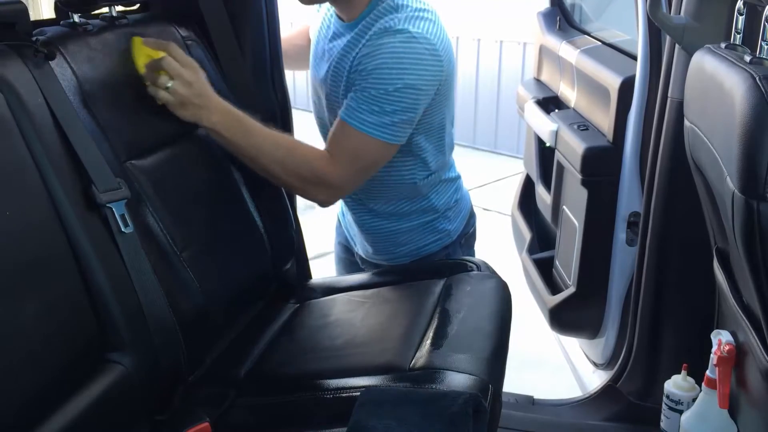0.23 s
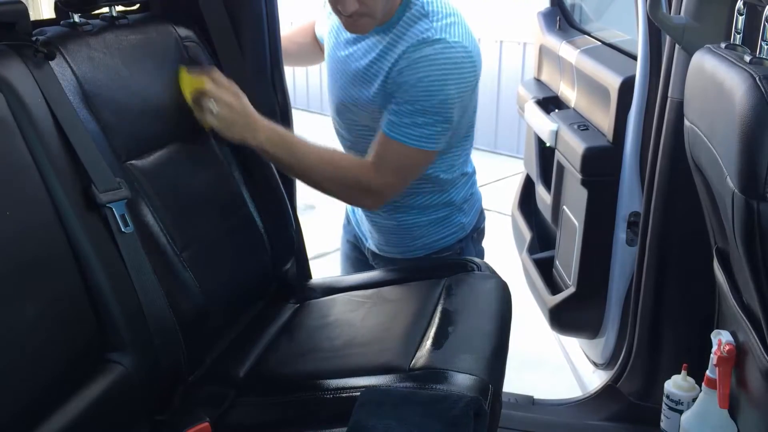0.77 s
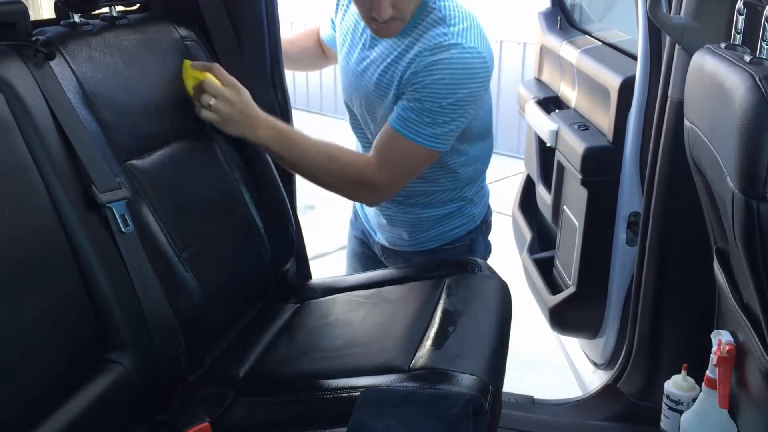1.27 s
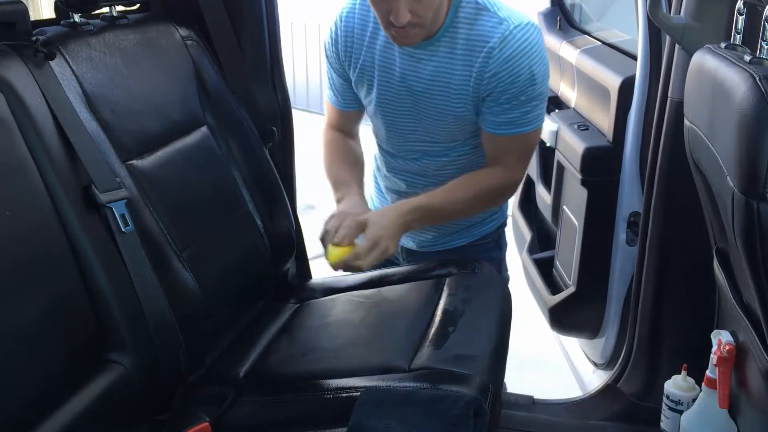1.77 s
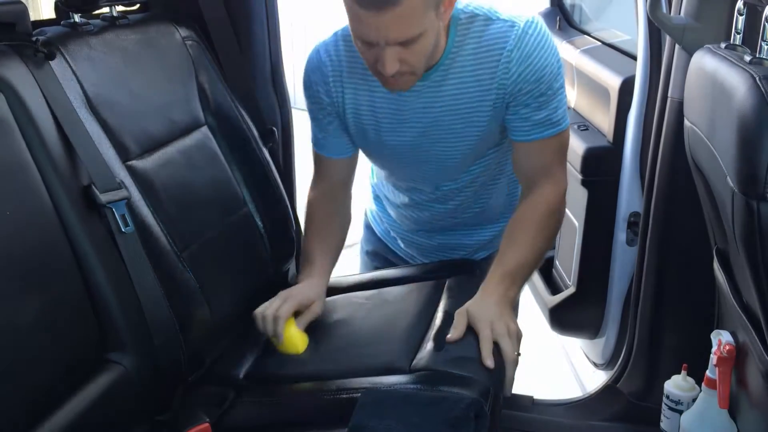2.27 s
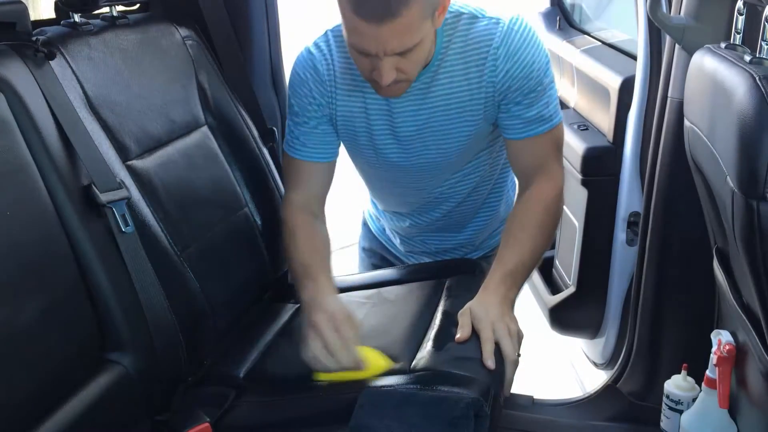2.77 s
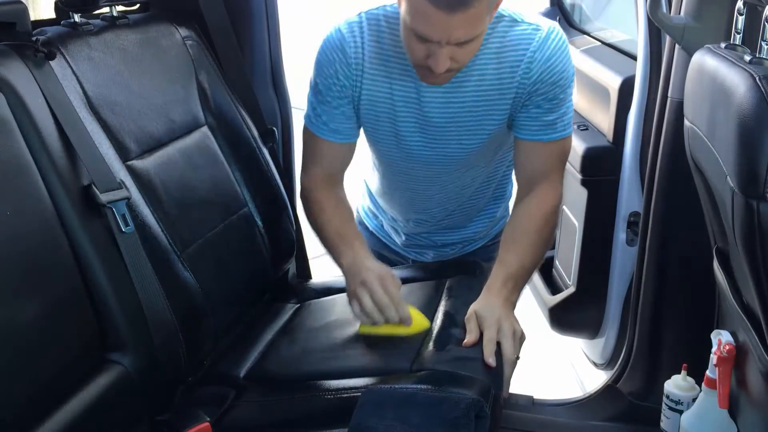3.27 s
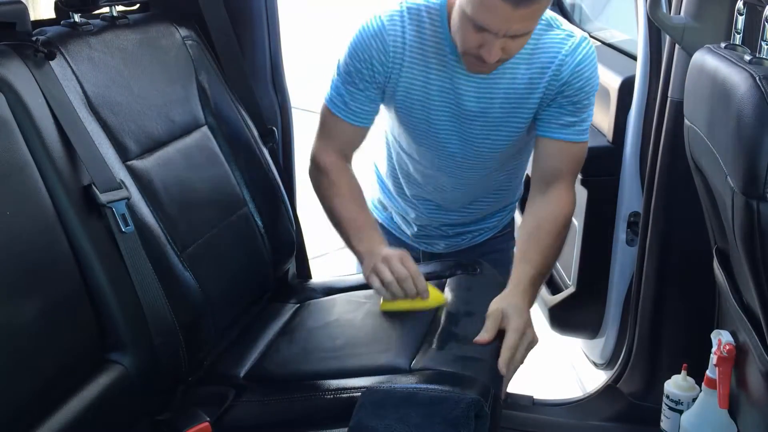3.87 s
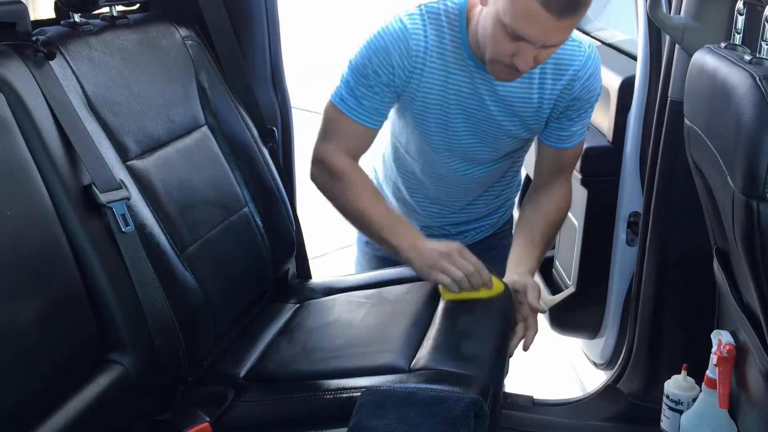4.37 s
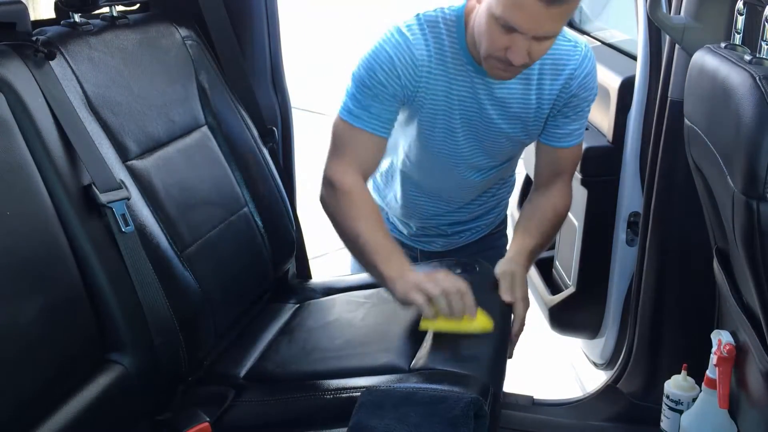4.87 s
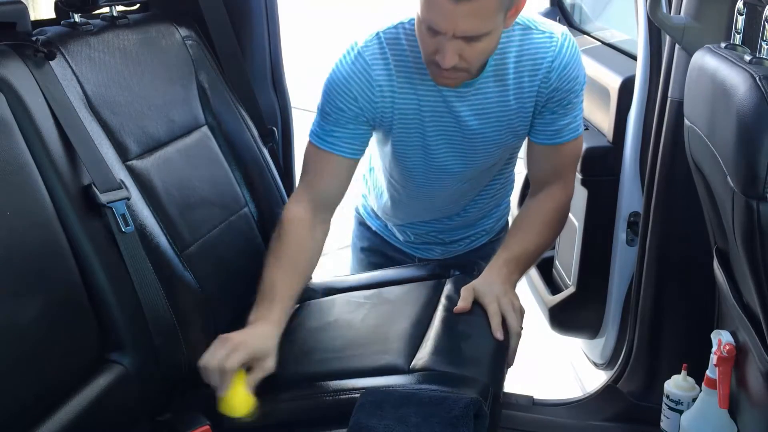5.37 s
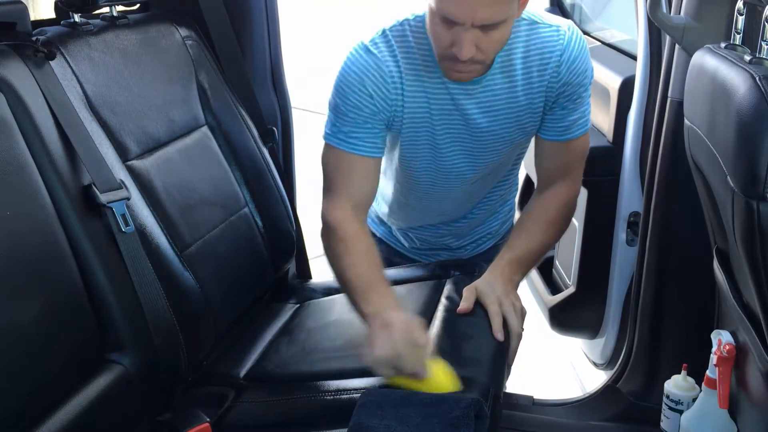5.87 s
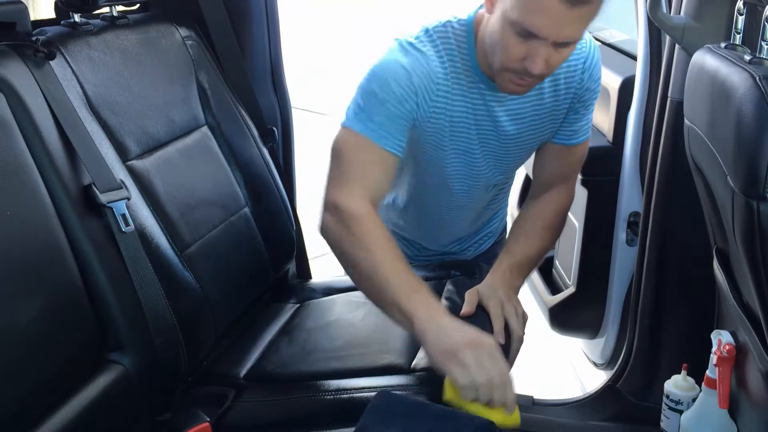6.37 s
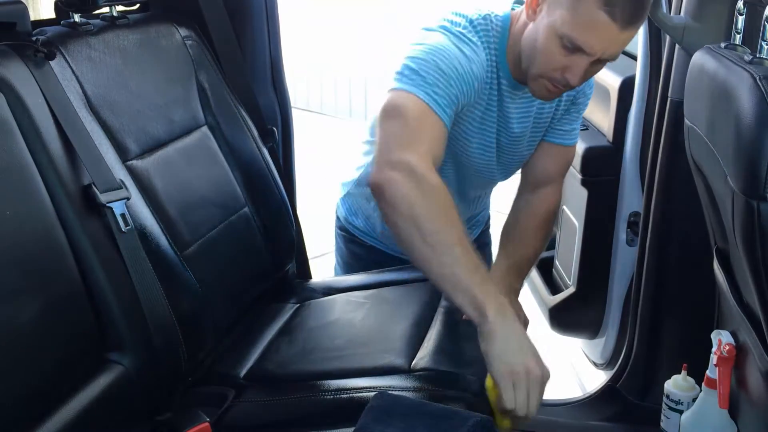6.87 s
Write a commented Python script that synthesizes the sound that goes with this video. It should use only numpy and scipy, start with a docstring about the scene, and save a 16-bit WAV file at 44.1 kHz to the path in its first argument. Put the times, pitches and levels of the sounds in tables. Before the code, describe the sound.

Bristles hiss back and forth over wet leather inside a car, while the seat thumps and creaks and air buffets the microphone.

```python
"""Inside a car with the door open, a hand brush scrubs a wet leather seat, stroke by stroke.
Thousands of tiny bristle flicks make a hiss that follows the hand's speed and sinks at each turn.
Moving air buffets the microphone, and a low drone comes in from outside. The seat creaks, thuds
and groans as it is leant on, bumped and brushed. Once the brush lifts while the hand changes grip;
later the bristles twice grab the leather and judder."""
import sys
import numpy as np
from scipy import signal
from scipy.fft import rfft, irfft
from scipy.io import wavfile
from scipy.ndimage import uniform_filter1d

SR = 44100
rng = np.random.default_rng(int(sys.argv[2]) if len(sys.argv) > 2 else 0)


def to_wav(s):
    """Save 16-bit WAV."""
    ch = np.atleast_2d(s).T  # columns
    pcm = np.round(np.clip(ch, -1, 1) * 32767)  # PCM
    wavfile.write(sys.argv[1], SR, pcm.astype(np.int16))


N = 313992
TIME = np.arange(N) / SR
HZ = np.fft.rfftfreq(N, 1 / SR)

# strokes of the brush:
# (start [s], length [s], speeding up [s], slowing down [s], hiss [dB], fizz [dB], rasp [dB])
STROKES = [(-0.025, 0.23, 0.024, 0.38, -41, -33, -40), (0.173, 0.29, 0.089, 0.066, -52, -42, -45),
           (0.484, 0.17, 0.023, 0.092, -47.5, -42.0, -46), (0.666, 0.28, 0.052, 0.11, -51, -42.5, -47.5),
           (0.83, 0.25, 0.24, 0.036, -53, -48, -52.5), (1.087, 0.22, 0.052, 0.091, -48.5, -42.5, -43.0),
           (1.31, 0.39, 0.065, 0.34, -49.5, -42.5, -45.5), (2.02, 0.08, 0.011, 0.024, -58, -52.5, -57),
           (2.071, 0.47, 0.45, 0.092, -50.0, -44.0, -48.5), (2.458, 0.27, 0.24, 0.04, -51, -47.5, -47),
           (2.754, 0.15, 0.062, 0.044, -51.0, -47, -50.5), (2.924, 0.17, 0.072, 0.066, -48.5, -46, -46),
           (3.12, 0.26, 0.046, 0.14, -51.5, -50.5, -47.5), (3.365, 0.2, 0.078, 0.139, -52.0, -49.5, -48),
           (3.554, 0.28, 0.16, 0.178, -49.5, -47.5, -49.0), (3.827, 0.34, 0.08, 0.16, -51.0, -48.5, -49.5),
           (4.116, 0.27, 0.18, 0.152, -52.5, -49.5, -48.5), (4.376, 0.2, 0.23, 0.096, -45, -43, -40),
           (4.57, 0.24, 0.12, 0.071, -62, -58, -56), (4.77, 0.3, 0.078, 0.087, -58, -52.0, -53.5),
           (5.028, 0.42, 0.29, 0.14, -42.5, -42.5, -45), (5.421, 0.48, 0.22, 0.32, -48.5, -44.5, -47.5),
           (5.825, 0.2, 0.21, 0.1, -44.0, -42, -43.5), (5.986, 0.22, 0.032, 0.29, -46, -44, -40.5),
           (6.163, 0.17, 0.206, 0.1, -47.5, -45.5, -44), (6.291, 0.16, 0.089, 0.06, -51, -50, -50),
           (6.458, 0.11, 0.0092, 0.08, -43.5, -48.0, -48), (6.537, 0.11, 0.099, 0.034, -46.5, -48, -49.0),
           (6.66, 0.088, 0.018, 0.043, -41.5, -46, -49.5), (6.748, 0.12, 0.03, 0.053, -46.5, -47.5, -49.5),
           (6.883, 0.076, 0.017, 0.025, -42, -47.5, -50.5), (6.962, 0.29, 0.016, 0.074, -53.5, -52, -52.5)]
# tone of bristles on leather: (frequency [Hz], gain [dB])
BRISTLE_COLOUR = [(100, -9.5), (220, -4.5), (300, -7), (600, -4), (950, -5), (1500, -6), (2500, -7),
                  (4000, -9.5), (5200, -10), (6600, -15), (9500, -13.5), (12800, -13.5), (14300, -15.5),
                  (15400, -28.5)]
# pitches weakened by echoes from the windows: (frequency [Hz], width [Hz], depth [0-1])
WINDOW_NOTCHES = [(750, 206, 0.44), (1350, 51, 0.51)]
# notes at which the brush block rings: (frequency [Hz], width [Hz], gain [dB])
BLOCK_RINGS = [(1570, 82, -1.5), (3000, 290, -8), (3660, 290, -10), (5200, 720, -10)]
# the ring of each patch of leather the brush reaches: (start [s], frequency [Hz], gain [dB])
LEATHER_PATCHES = [(0, 1600, -12), (.95, 1740, 0.5), (2.1, 1750, -27), (2.74, 2440, 3.5), (3.1, 1550, -3),
                   (3.55, 1570, -23), (5.05, 1530, -4), (5.95, 1580, -2), (6.65, 3700, -8)]
# tone of air pushing on the microphone: (frequency [Hz], gain [dB])
BUFFET_COLOUR = [(3, -8), (8, -3.5), (16, -6), (30, -15), (50, -22), (90, -31), (160, -62), (400, -83)]
# breeze through the open door: (time [s], level [dB])
BREEZE = [(0, -27), (2.8, -32), (4.0, -36.5), (4.85, -38), (5.8, -42), (7.12, -31.5)]
# the body shifts its weight, pushing air and flexing the cushion:
# (middle [s], length [s], air level [dB], relative cushion level [dB])
LEANS = [(.12, 0.25, -21.5, -36.5), (0.674, 0.14, -27, -47), (1.143, .45, -25.5, -44), (1.53, .4, -35, -37),
         (2.224, .14, -17.5, -44), (2.4, 0.41, -24.5, -40), (3.07, 0.098, -25.5, -50),
         (3.584, 0.11, -29.5, -54), (4.35, 0.28, -33, -43.5), (6.004, 0.18, -34, -48.5),
         (6.755, 0.93, -33, -51)]
# tone of the outdoor air: (frequency [Hz], gain [dB])
AIR_COLOUR = [(59, -56), (100, -7.5), (279, -12.5), (733, -31.5), (867, -19.5), (1240, -25), (6090, -34.5),
              (11900, -34), (15000, -39)]
# low drone from outside: (time [s], level [dB])
DRONE = [(0, -47), (3.4, -42.5), (4.4, -38.5), (4.9, -47), (7.12, -42.5)]
# tone of the creaking cushion: (frequency [Hz], gain [dB])
CUSHION_COLOUR = [(40, 16.5), (80, 7.5), (130, 14.5), (190, -2.5), (280, -6.5), (400, -8.5), (700, -15.5),
                  (1500, -34)]
# notes at which the seat rings: (frequency [Hz], gain [dB], time to fade by 60 dB [s])
SEAT_RINGS = [(139, -9.5, 0.15), (167.4, -5.5, 0.12), (194, -1.5, 0.029), (253, -11.5, 0.04),
              (278.3, -7, 0.16), (350, -15, 0.016), (539.4, -5, 0.077), (600, -7, 0.035),
              (769, -2.5, 0.044), (836, -5.5, 0.034), (910, -11, 0.048), (1140, -9, 0.03),
              (1380, -6, 0.046)]
# bumps on the seat: (time [s], peak before echoes [dB], treble cutoff [Hz], crumple time [s])
BUMPS = [(0.093, -19.5, 1550, 0.019), (0.537, -24, 770, 0.021), (1.098, -25.5, 267, 0.0054),
         (1.199, -23.5, 480, 0.011), (1.228, -24.5, 447, 0.022), (1.366, -25, 294, 0.0044),
         (1.441, -8, 317, 0.0008), (1.471, -14.5, 760, 0.003), (1.504, -3.5, 1030, 0.0038),
         (1.516, -23, 1170, 0.0048), (1.548, -16, 450, 0.0063), (1.566, -25, 520, 0.01),
         (2.2, -27, 705, 0.0038), (2.222, -18.5, 414, 0.0016), (2.224, -21.5, 2210, .003),
         (2.298, -25, 378, 0.0024), (2.426, -27, 404, 0.025), (4.315, -26, 240, 0.021),
         (5.97, -32.5, 534, 0.0087), (6.361, -26, 650, 0.016), (6.817, -29, 257, 0.0061)]
# groans of the stretched cover: (middle [s], length [s], pitch [Hz], level [dB])
GROANS = [(0.563, 0.118, 337, -43.5), (0.717, 0.22, 305, -53.5), (2.054, 0.16, 760, -56),
          (3.055, 0.28, 300, -55), (3.408, 0.11, 600, -54.5), (3.727, .12, 370, -51.5),
          (5.292, 0.14, 330, -50.5), (5.62, 0.19, 253, -47)]
# tone of fingers sliding on the handle: (frequency [Hz], gain [dB])
HANDLE_COLOUR = [(300, -7), (900, -3), (1350, -12), (1750, -1), (2200, -7), (2900, -16), (3600, -8),
                 (5500, -20), (12000, -30)]
# fingers graze the bristles: (middle [s], level [dB], length [s])
GRAZES = [(1.799, -55, 0.054), (1.858, -57.5, .045), (1.951, -57, 0.046), (1.997, -71, .03)]
# bristles grab the leather, one list per grab: (time [s], relative level [dB], rasp centre [Hz])
GRABS = [
    [(4.28, -60, 1180), (4.308, -33.5, 1130), (4.338, -54, 1020), (4.345, -53, 993)],
    [(4.405, -49, 1550), (4.439, -37, 1570), (4.495, -30.5, 1430), (4.551, -36.5, 790), (4.585, -54, 801)],
]
# notes at which the tight cover rings when grabbed: (frequency [Hz], width [Hz], gain [dB])
COVER_RINGS = [(442, 86, 18), (595, 97, 13), (660, 61, -6), (995, 200, 4.5), (1117, 71, 6), (1265, 58, 8.5),
               (1550, 50, 9), (1635, 80, 8), (2100, 280, 4), (2660, 250, 7.5), (3210, 160, 9.5),
               (3690, 150, -4), (4310, 80, -19)]


def gain_of(db):
    """Turns decibels into a number to multiply a sound by."""
    return 10 ** (np.asarray(db) / 20)


def evened(x):
    """Scales a sound to an average strength (rms) of 1."""
    return x / np.sqrt(np.mean(x ** 2) + 1e-20)


def loudness(x):
    """Running strength (rms) over about a sixth of a second."""
    return np.sqrt(abs(uniform_filter1d(x ** 2, size=7000)) + 1e-12)


def colour(points):
    """Joins (frequency, dB) points into a gain for every frequency."""
    hz, db = np.transpose(points)
    return gain_of(np.interp(np.log(HZ + 1), np.log(hz + 1), db))


def shaped(x, gain):
    """Filters a sound with one gain per frequency."""
    return irfft(rfft(x) * gain, N)


def level_curve(rows):
    """Joins rows that begin (time, dB) into a gain for every sample."""
    times, db = np.transpose(rows)[:2]
    return gain_of(np.interp(TIME, times, db))


def noise():
    """White noise."""
    return rng.standard_normal(N)


def drift(rate_hz):
    """A random wobble, mostly slower than rate_hz."""
    return evened(shaped(noise(), 1 / (1 + (HZ / rate_hz) ** 4)))


def resonance(hz, width):
    """The filter of something that rings at one note, with gain 1 at its peak."""
    return 1j * HZ * width / (hz ** 2 - HZ ** 2 + 1j * HZ * width)


def resonate(x, hz, width):
    """Makes a sound ring at a note that can glide: hz holds one pitch per sample."""
    turn = np.exp(2j * np.pi * np.cumsum(hz) / SR)
    decay = np.exp(-np.pi * width / SR)
    return 2 * (turn * signal.lfilter([1 - decay], [1, -decay], x / turn)).real


def add(mix, start, sound):
    """Mixes a sound in at a start time in seconds."""
    at = round(start * SR)
    sound = sound[max(-at, 0):]
    part = mix[max(at, 0):][:len(sound)]
    part += sound[:len(part)]


def cabin(x, echo_db, fade_s):
    """Adds many short echoes from the windows and trim."""
    t = np.arange(SR // 3) / SR
    taps = rng.standard_normal(len(t)) * (rng.random(len(t)) < .06) * (t > .002)
    taps *= gain_of(-60 * t / fade_s)
    echoes = signal.fftconvolve(x, taps / np.linalg.norm(taps))[:N]
    return (x + gain_of(echo_db) * echoes) / np.hypot(1, gain_of(echo_db))


def flicks(per_s, spread_db, clump_db):
    """Tiny snaps and slips: random clicks of uneven size, bunched as when whole tufts let go."""
    size = gain_of(spread_db * np.minimum(rng.exponential(1, N), 4))
    clicks = noise() * size * (rng.random(N) < per_s / SR)
    return evened(clicks * gain_of(clump_db * drift(rate_hz=620)))


def stroke_levels(turning_db=(-71, -71, -61.5), catch_power=0.59):
    """Hiss, fizz and rasp follow the hand's speed; at a turn the bristles only bend and little is left."""
    power = np.ones((3, N)) * gain_of(turning_db)[:, None] ** 2
    for start, length, rise, fall, *levels_db in STROKES:
        t = np.arange(0, length, 1 / SR)
        speeding, slowing = np.sin(np.pi / 2 * np.clip([t / rise, (length - t) / fall], 0, 1))
        drive = speeding ** catch_power * slowing  # bristles catch sharply and let go more softly
        for layer, db in zip(power, levels_db):
            add(layer, start, (gain_of(db) * drive) ** 2)
    return np.sqrt(power)


def patch_ring(clicks, width_hz=150):
    """The leather under the brush rings; the note glides as the brush reaches the next patch."""
    starts, hz, db = np.transpose(LEATHER_PATCHES)
    patch = np.maximum(np.searchsorted(starts, TIME, "right") - 1, 0)
    level = uniform_filter1d(gain_of(db)[patch], size=2000)
    pitch = uniform_filter1d(hz[patch], size=2000)
    return level * resonate(clicks, pitch, width_hz)


def backrest_sheen(x, until_s=1.5, above_hz=12000, boost_db=3.4):
    """The backrest faces the microphone, so the first strokes, made on it, keep more treble."""
    treble = shaped(x, 1 - 1 / (1 + (HZ / above_hz) ** 12))
    return x + treble * (gain_of(boost_db) - 1) * (TIME < until_s)


def scrub(low_hz=3100, high_hz=6300, bite_range_db=14, lifted_s=(1.76, 2.015)):
    """Flicks sound through the leather (low rasp), the bristles (hiss) and the wet film (high fizz)."""
    hiss, fizz, rasp = stroke_levels()
    notches = abs(1 - sum(depth * resonance(hz, width) for hz, width, depth in WINDOW_NOTCHES))
    snaps = flicks(per_s=30000, spread_db=1.3, clump_db=.7)
    clicks = shaped(cabin(snaps, echo_db=-9.5, fade_s=0.019), colour(BRISTLE_COLOUR) * notches)
    # the harder the bristles bite through the wet film, the more the block rings
    bite = np.clip(.5 + 20 * np.log10(hiss / fizz) / bite_range_db, 0, 1)
    block = shaped(clicks, sum(gain_of(db) * resonance(hz, width) for hz, width, db in BLOCK_RINGS))
    clicks = backrest_sheen(clicks + bite * block + patch_ring(clicks))
    lows = 1 / (1 + (HZ / low_hz) ** 6)
    highs = 1 - 1 / (1 + (HZ / high_hz) ** 14)
    bands = [(lows, (HZ > 1000) & (HZ < 3000), rasp),
             (1 - lows - highs, (HZ > 3300) & (HZ < 5800), hiss),
             (highs, HZ > 7500, fizz)]
    out = np.zeros(N)
    for band, core, level in bands:  # steady each band by its core, then let the strokes swell it
        out += shaped(clicks, band) / loudness(shaped(clicks, core)) * level
    touching = (TIME < lifted_s[0]) | (TIME > lifted_s[1])
    return out * uniform_filter1d(touching.astype(float), size=400)


def lean_levels():
    """Strength of pushed air and of cushion creak: one smooth swell for each shift of weight."""
    air, creak = np.zeros((2, N))
    for middle, length, air_db, cushion_db in LEANS:
        swell = np.cos(np.pi * np.clip((TIME - middle) / length, -.5, .5))
        air += gain_of(air_db) * swell
        creak += gain_of(cushion_db) * swell
    return air, creak


def buffet():
    """Slow swirls of air, from the breeze and the leaning body, push on the microphone."""
    swirls = shaped(noise(), colour(BUFFET_COLOUR) / (1 + (HZ / 600) ** 4))
    audible = shaped(swirls, HZ > 20)
    pushed_air, _ = lean_levels()
    return swirls / loudness(audible) * np.hypot(level_curve(BREEZE), pushed_air)


def outdoors(drone_hz=76, width_hz=12, air_db=-57):
    """A faint wash of air and a wavering low drone come in from outside."""
    drone = evened(shaped(noise(), resonance(drone_hz, width_hz) ** 2))
    air = evened(shaped(noise(), colour(AIR_COLOUR)))
    return gain_of(air_db) * air + level_curve(DRONE) * drone


def cushion(resting_db=-46.5, lean_boost_db=2, ring_db=8):
    """Foam and leather creak dully under the hand, more with each lean, and make the seat ring."""
    ring = sum(gain_of(db + ring_db) * resonance(hz, 1.16 / fade_s) for hz, db, fade_s in SEAT_RINGS)
    slips = flicks(per_s=990, spread_db=4.5, clump_db=2.5)
    creak = evened(shaped(slips, colour(CUSHION_COLOUR) * (1 + ring)))
    _, flexing = lean_levels()
    return creak * np.hypot(gain_of(resting_db), flexing * gain_of(lean_boost_db))


def bumps(push_db=11, push_s=0.0035, crumple_db=-19, low_hz=130):
    """A bump is a push, a brief crumple of leather and the seat's ring; soft blows have less treble."""
    t, out = np.arange(SR // 2) / SR, np.zeros(N)
    ring = sum(gain_of(db - 60 * t / fade_s) * np.cos(2 * np.pi * hz * t)
               for hz, db, fade_s in SEAT_RINGS)
    push = gain_of(push_db) * (1 - t / push_s) * np.exp(-t / push_s)
    blow = signal.sosfilt(signal.butter(2, low_hz, "high", fs=SR, output="sos"), ring + push)
    for start, db, cutoff_hz, length in BUMPS:
        crumple = rng.standard_normal(len(t)) * (t / length) * np.exp(-2 * t / length)
        force = (t == 0) + gain_of(crumple_db) * crumple
        soften = signal.butter(6, cutoff_hz, fs=SR, output="sos")
        thud = signal.sosfilt(soften, signal.fftconvolve(force, blow))
        add(out, start, gain_of(db) * thud / abs(thud).max())
    return cabin(out, echo_db=-3.5, fade_s=0.087)


def groans(width_share=0.14):
    """Under the brush, a swell of small slips makes the stretched cover ring at one note."""
    slips, out = flicks(per_s=1900, spread_db=4, clump_db=4.5), np.zeros(N)
    for middle, length, hz, db in GROANS:
        on = abs(TIME - middle) < length / 2
        pitch = np.full(on.sum(), hz)
        ring = resonate(slips[on], pitch, width_share * hz)
        ring = resonate(ring, pitch, width_share * hz)  # a second pass makes the note clearer
        out[on] += gain_of(db) * evened(ring) * signal.windows.cosine(on.sum())
    return out


def regrip(start_s=1.59, length_s=0.46, level_db=-54.5, fade_db=-9):
    """Fingers slide on the hollow handle: a soft rustle that dies away."""
    progress = np.clip((TIME - start_s) / length_s, 0, 1)
    swell = np.sqrt(abs(np.sin(np.pi * progress)))
    rustle = evened(shaped(flicks(per_s=4700, spread_db=2.5, clump_db=0), colour(HANDLE_COLOUR)))
    return rustle * gain_of(level_db + fade_db * progress) * swell


def grazes(low_hz=7600):
    """Fingers graze the lifted bristles; with no leather under them they give only a thin fizz."""
    swell = np.zeros(N)
    for middle, db, length in GRAZES:
        add(swell, middle - length / 2, gain_of(db) * signal.windows.tukey(int(length * SR), .7))
    thin = colour(BRISTLE_COLOUR) * (1 - 1 / (1 + (HZ / low_hz) ** 8))
    return swell * evened(shaped(flicks(per_s=9000, spread_db=1.5, clump_db=1), thin))


def judder(boost_db=1, slips_per_s=380, jitter=.35, grit_db=-4, width_octaves=0.87):
    """Bristles stick and slip unevenly, ringing the tight cover; the rasp darkens as the brush slows."""
    slip_count = np.cumsum(slips_per_s * np.exp(jitter * drift(rate_hz=180))) / SR
    slips = np.diff(np.floor(slip_count), prepend=0) * gain_of(2 * noise())
    grit = flicks(per_s=2500, spread_db=2.5, clump_db=2)
    cover = sum(gain_of(db) * resonance(hz, width) for hz, width, db in COVER_RINGS)
    ring = shaped(evened(slips) + gain_of(grit_db) * grit, cover)
    # in short slices of time, keep the frequencies near the rasp's moving centre
    hz, t, slices = signal.stft(cabin(ring, echo_db=-8, fade_s=0.095), SR, nperseg=256)
    times, _, centre_hz = np.vstack(GRABS).T
    octaves_away = np.log2((hz[:, None] + 1) / np.interp(t, times, centre_hz))
    slices *= np.exp(-.5 * (octaves_away / width_octaves) ** 2)
    rasp = signal.istft(slices, SR, nperseg=256)[1][:N]
    out = np.zeros(N)
    for grab in GRABS:
        on = (TIME > grab[0][0]) & (TIME < grab[-1][0])
        out[on] += evened(rasp[on]) * level_curve(grab)[on] * signal.windows.tukey(on.sum(), .1)
    return out * gain_of(boost_db)


def scene():
    """All the sounds meet at one microphone inside the car."""
    mix = scrub() + buffet() + outdoors() + cushion() + bumps() + groans()
    mix += regrip() + grazes() + judder()
    return mix[None]


def record(dry, top_hz=15500):
    """Fades both ends briefly and cuts the very highest treble."""
    fade = signal.windows.tukey(N, .004)
    treble_cut = signal.firwin(511, top_hz, window=("kaiser", 9), fs=SR)
    return signal.oaconvolve(dry * fade, treble_cut[None], "same")


dry = scene()
out = record(dry)
to_wav(out)
```